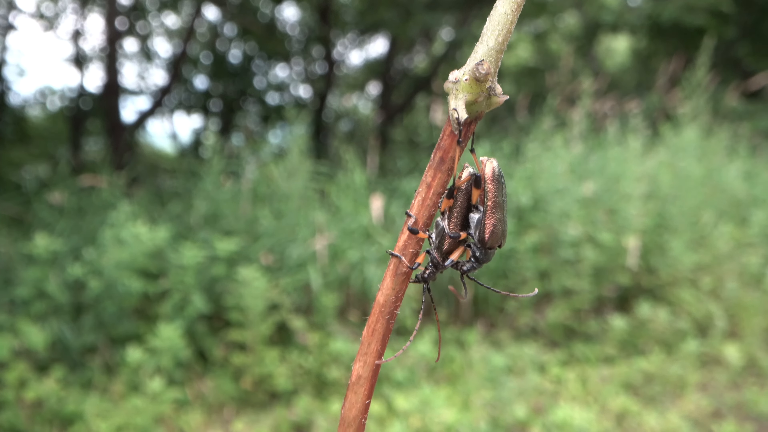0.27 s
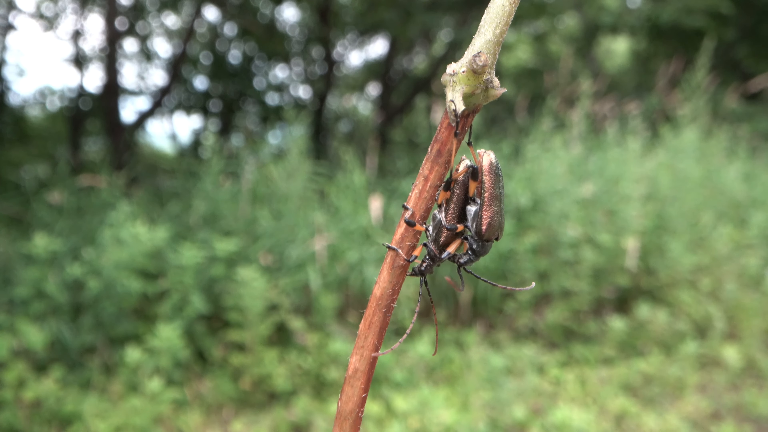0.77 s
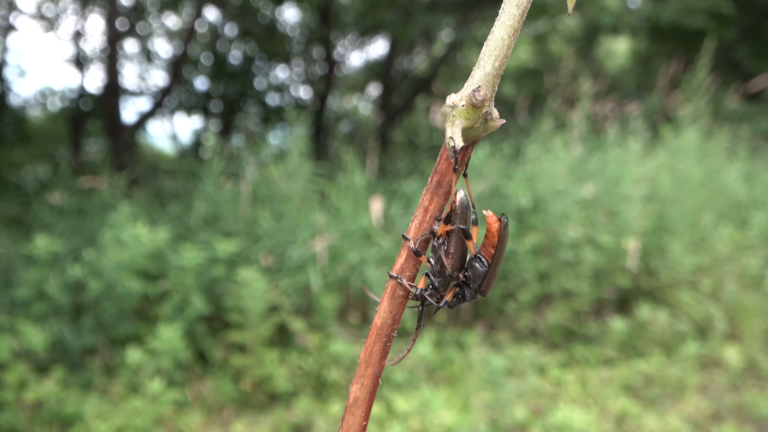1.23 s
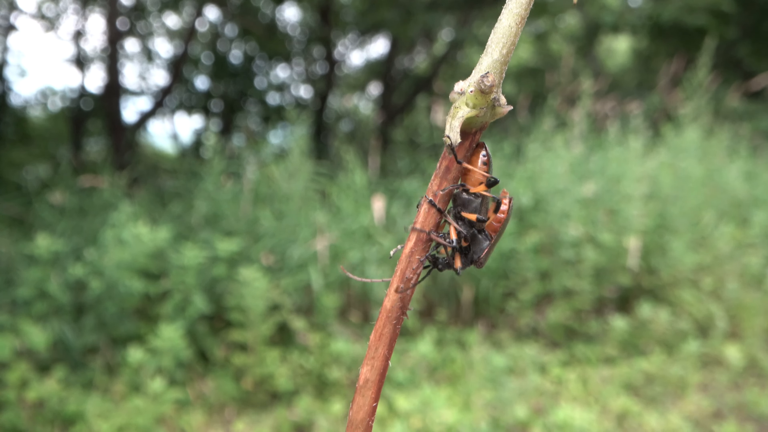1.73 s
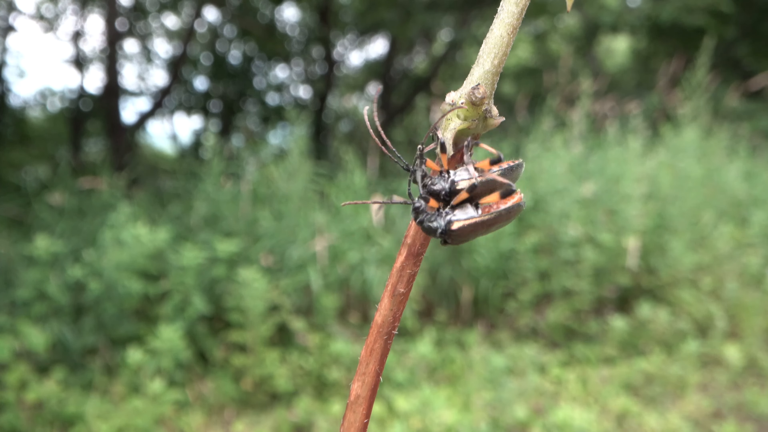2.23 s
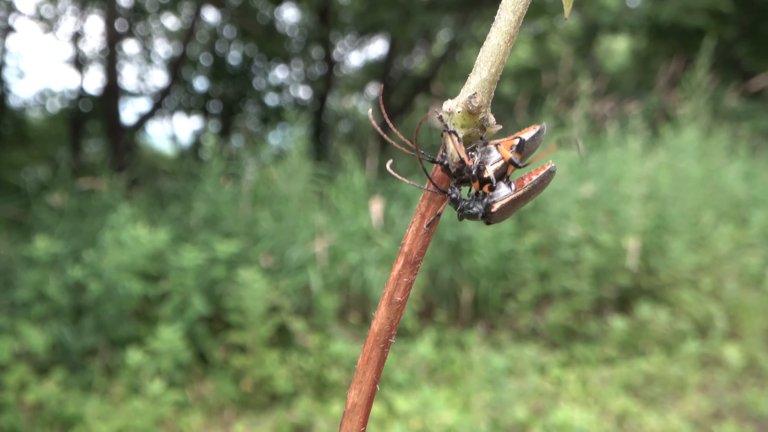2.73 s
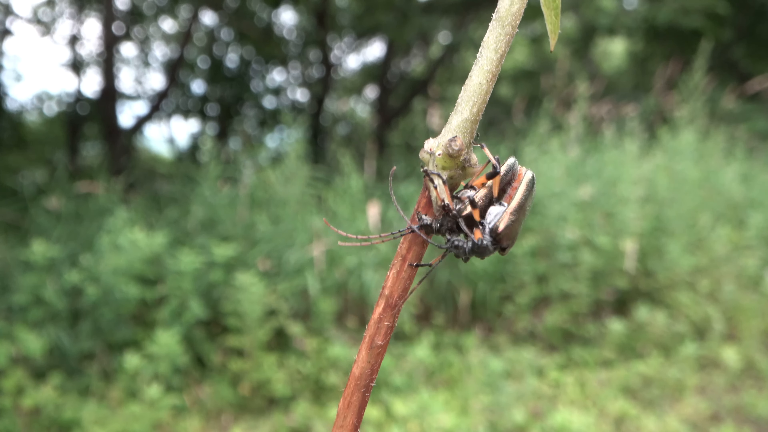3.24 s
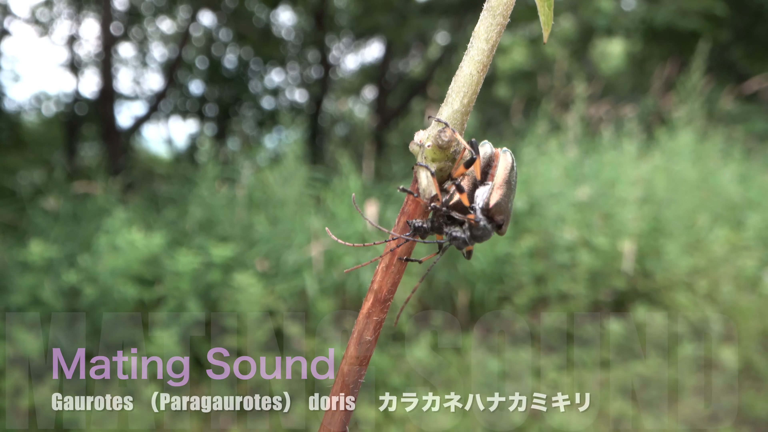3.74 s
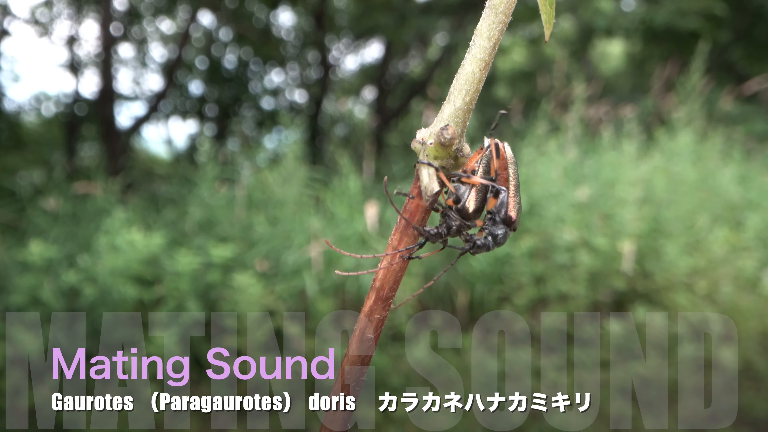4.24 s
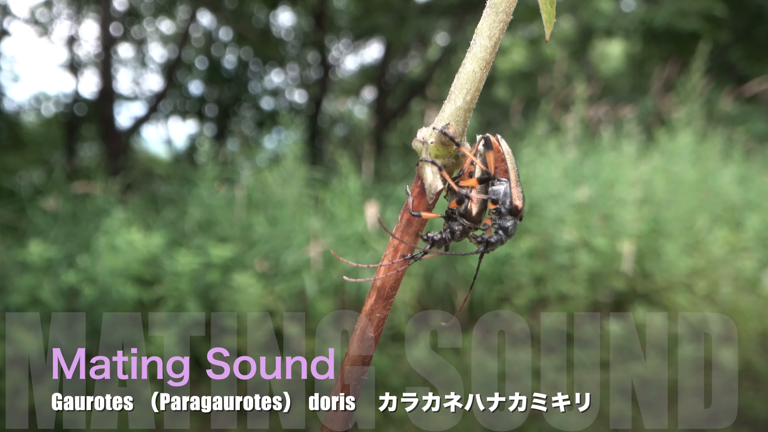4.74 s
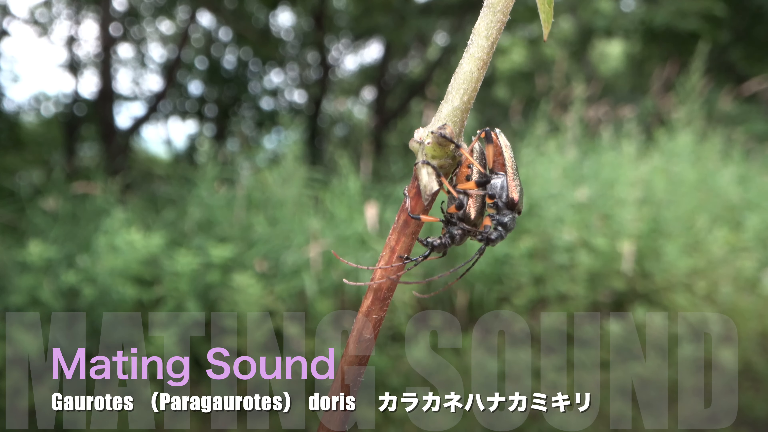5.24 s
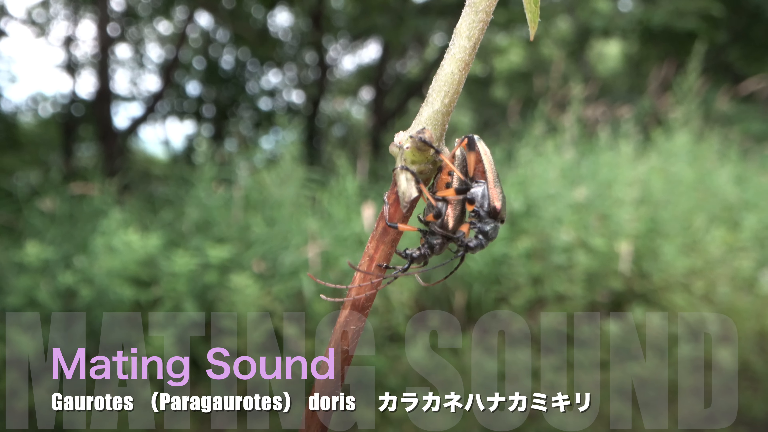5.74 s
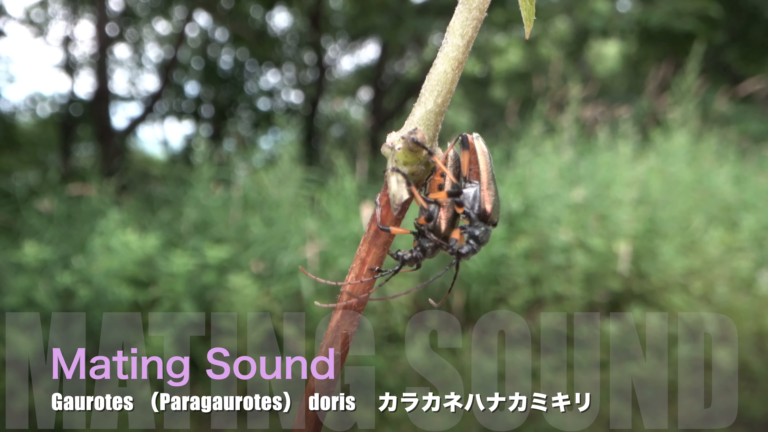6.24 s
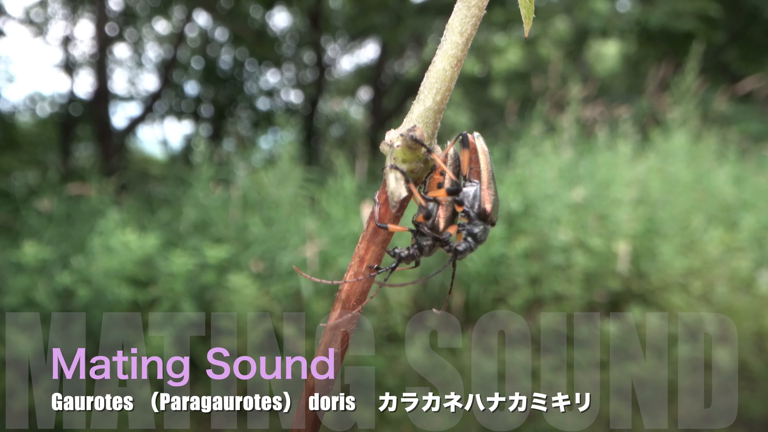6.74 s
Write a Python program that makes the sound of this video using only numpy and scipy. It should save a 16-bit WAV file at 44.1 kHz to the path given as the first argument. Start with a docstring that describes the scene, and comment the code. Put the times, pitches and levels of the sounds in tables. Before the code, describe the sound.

A soft, low, steady rush plays alone for just over a second. Then two beetles scuffle on a thin twig, with dense claw snaps, bark scrapes and small woody thuds, peaking into brief overload near two seconds. The struggle breaks into bursts with two tiny rasping squeaks, then single dry ticks. A contact pickup on the wood makes it huge and intimate, nearly mono, without room echo.

```python
"""Two beetles scramble on a thin twig, heard through a pickup touching the wood, over a soft steady rush of noise.
First the rush is alone; then claws snap and scrape densely, overloading the pickup at the height.
The struggle thins out, with two short squeaks of stick-slip on the bark, and ends in single ticks.
Each contact is a force convolved with the twig's response: a thud, a woody ring and a glassy top."""
import sys
import numpy as np
from scipy import signal
from scipy.fft import rfft, irfft, next_fast_len
from scipy.io import wavfile
from scipy.ndimage import uniform_filter1d

SR = 44100
rng = np.random.default_rng(int(sys.argv[2]) if len(sys.argv) > 2 else 0)


def store_wav(level_fs):
    """Save 16-bit WAV to argv[1]."""
    pcm = np.round(np.clip(np.atleast_2d(level_fs), -1, 1) * 32767)
    wavfile.write(sys.argv[1], SR, pcm.T.astype(np.int16))


N = 308145
TAPS, LEAD = 4096, 400  # twig response length and pre-roll [samples]


def amp(db):
    """Decibels to gain."""
    return 10 ** (np.asarray(db) / 20)


def evened(x):
    """Each row scaled to rms 1."""
    return x / np.sqrt(np.mean(x ** 2, axis=-1, keepdims=True) + 1e-20)


def add(mix, time_s, sound):
    """Adds a sound to the mix in place, cut at the mix's end."""
    part = mix[round(time_s * SR):][:len(sound)]
    part += sound[:len(part)]


# outdoor rush spectrum: (frequency [Hz], relative density [dB per Hz])
RUSH_SPECTRUM = [(25, -20), (55, -9), (150, -3.5), (300, -1), (900, -5.5), (2000, -14), (5000, -23),
                 (15500, -30.5)]


def rush(level_db=-49):
    """Steady noise, strongest in the low middle."""
    hz = np.fft.rfftfreq(N, 1 / SR)
    knot_hz, knot_db = np.transpose(RUSH_SPECTRUM)
    colour = amp(np.interp(np.log(hz + 1), np.log(knot_hz + 1), knot_db))
    return amp(level_db) * evened(irfft(rfft(rng.standard_normal(N)) * colour, N))


# bending modes of twig plus pickup: (frequency [Hz], width [Hz], relative level [dB])
TWIG_MODES = [(49.2, 32, -24), (103, 9.2, -0.5), (274, 100, 3), (342, 132, 2.5), (625, 263, 1.5),
              (1000, 590, -15.5), (1432, 84, -2), (1757, 434, -4.5), (2713, 1160, -3.5), (3192, 226, 7),
              (3427, 336, 4), (3940, 480, -10), (4730, 370, -10.5), (5900, 400, -16.5), (7610, 540, -3.5),
              (8800, 660, -19), (10560, 1900, -23), (13800, 1600, -28.5)]
# thud, ring and top registers: (from [Hz], to [Hz])
REGISTERS_HZ = [(60, 1200), (1200, 5500), (5500, 16000)]


def twig(skirt=1.39, suddenness=0.85, lag_s=0.000655, scatter_db=-15, scatter_t60_s=0.048):
    """Response of the twig's modes to one sharp push at LEAD samples, with bending-wave dispersion."""
    hz = np.fft.rfftfreq(TAPS, 1 / SR) + 1
    power = sum(amp(db) ** 2 / (1 + (2 * (hz - f) / width) ** 2) ** skirt for f, width, db in TWIG_MODES)
    log_gain = .5 * np.log(power + 1e-10)
    # the ring takes a few cycles to build up
    mirrored = np.concatenate([log_gain, log_gain[-2:0:-1]])
    phase = -suddenness * signal.hilbert(mirrored).imag[:len(hz)]
    # bending waves are slower in the bass: the thud trails the tick
    phase -= 4 * np.pi * lag_s * np.sqrt(REGISTERS_HZ[0][1] * hz)
    direct = np.roll(irfft(np.exp(log_gain + 1j * phase)), LEAD)
    # faint returns from joints and far ends of the branch
    returns = rng.standard_normal(TAPS) * amp(-60 * np.arange(TAPS) / SR / scatter_t60_s)
    returns *= amp(scatter_db) / np.linalg.norm(returns)
    return direct + signal.fftconvolve(direct, returns)[:TAPS]


# core of each register: (from [Hz], to [Hz])
CORES_HZ = [(30, 700), (2500, 4000), (7000, 8300)]
# treble from AIR_HZ up takes only this share of the top's extra gain over the ring
AIR_HZ, AIR_SHARE = 9510, .65
# thuds below FIRM_DB lose SWING_SLOPE dB more per dB in the bass below SWING_HZ
SWING_HZ, FIRM_DB, SWING_SLOPE = 174.4, -29.5, 0.31


def excite(wood, force, levels_db, seconds):
    """A force rings the twig; levels_db aims each register's rms over the given time."""
    size = next_fast_len(len(force) + TAPS)
    hz = np.fft.rfftfreq(size, 1 / SR)
    # every spot on the twig favours other modes
    spot_db = np.interp(hz, np.geomspace(200, 16000, 22), 2.5 * rng.standard_normal(22))
    spectrum = rfft(force, size) * rfft(wood, size) * amp(spot_db)
    power = 2 * abs(spectrum) ** 2 / (size * seconds * SR)
    natural_db = [10 * np.log10(power[(hz > lo) & (hz < hi)].sum() + 1e-30) for lo, hi in REGISTERS_HZ]
    gains_db = np.subtract(levels_db, natural_db)
    air_db = gains_db[2] - (1 - AIR_SHARE) * max(gains_db[2] - gains_db[1], 0)
    # flat gain over each core, sloping between cores
    knots_hz = [*np.ravel(CORES_HZ), AIR_HZ]
    knots_db = [*np.repeat(gains_db, 2), air_db]
    tilt_db = np.interp(np.log(hz + 1), np.log(knots_hz), knots_db)
    swing_db = SWING_SLOPE * min(levels_db[0] - FIRM_DB, 0) / (1 + (hz / SWING_HZ) ** 4)
    return irfft(spectrum * amp(tilt_db + swing_db), size)


def registers(strength_db, weight_db, hardness_db):
    """Thud, ring and top levels: strength is the ring, weight thud over ring, hardness top over ring."""
    return np.array([strength_db + weight_db, strength_db, strength_db + hardness_db])


def grit(count, per_s, spread_db):
    """Tiny slips at random moments, most small and a few large."""
    chance, size, sign = rng.random((count, 3)).T
    sizes = amp(spread_db * np.minimum(-np.log(1 - size), 4))
    return (chance < per_s / SR) * sizes * np.sign(sign - .5)


def drag(wood, strokes, per_s, spread_db, fade, clump_db=3.5, contrast_db=4):
    """Strokes over rough bark as dense runs of slips, shared between a soft foot pad and a hard claw."""
    out = np.zeros(N)
    pad_db = [contrast_db, -contrast_db / 2, -contrast_db]
    claw_db = [-contrast_db, contrast_db / 2, contrast_db]
    for part_db in (pad_db, claw_db):
        # the two shares of power add up to 1
        share_db = -10 * np.log10(1 + amp(part_db) ** -2)
        # grip varies over about 10 ms, so slips clump
        grip_db = clump_db * evened(uniform_filter1d(rng.standard_normal(N), size=400))
        bark = grit(N, per_s, spread_db) * amp(grip_db)
        for start_s, end_s, *touch_db in strokes:
            end_s = max(end_s, start_s + .008)
            force = bark[round(start_s * SR):round(end_s * SR)]
            force = force * signal.windows.tukey(len(force), fade)
            sound = excite(wood, force, registers(*touch_db) + share_db, len(force) / SR)
            add(out, start_s - LEAD / SR, sound)
    return out


def release(wood, contacts, settle_s=0.0022, slip_size=0.54, lead_s=.0004, creep_s=0.0026, creep_size=.12):
    """A claw creeps a little, lets go sharply, then slips a few more times as it settles."""
    out = np.zeros(N)
    for time_s, *touch_db in contacts:
        force = np.zeros(2 * LEAD)
        before, after = rng.random((2, 5))
        creeps = LEAD - (before * min(creep_s * SR, LEAD)).astype(int)
        slips = LEAD + (after * min(settle_s * SR, LEAD)).astype(int)
        force[creeps] = creep_size * rng.uniform(-0.72, 1, size=5)
        force[slips] = slip_size * rng.uniform(-0.92, 1, size=5)
        force[LEAD] = 1
        sound = excite(wood, force, registers(*touch_db), seconds=.005)
        add(out, time_s - lead_s - 2 * LEAD / SR, sound)
    return out


# struggle driving the small footwork: (time [s], effort before each layer's trim [dB])
EFFORT = [(1.15, -73), (1.24, -42.5), (1.42, -32), (1.78, -38.5), (1.92, -29), (2.06, -42.5), (2.3, -43.5),
          (2.62, -43), (2.68, -45.5), (2.85, -40), (3.18, -45.5), (3.7, -56), (4.0, -53), (4.28, -49.5),
          (4.61, -44), (4.7, -57.5), (5.05, -54.5), (6.4, -67.5)]


def footwork(time_s, chance, uneven_db, hardness_db, weight_db=4, easy_db=-46, lightening=0.24):
    """Small contacts: feet pad softly at low effort, and the thud's share shrinks as effort grows."""
    effort_db = np.interp(time_s, *np.transpose(EFFORT))
    weights_db = weight_db - lightening * (effort_db - easy_db)
    usual_db = np.column_stack([effort_db, weights_db, np.full(len(time_s), hardness_db)])
    return usual_db + uneven_db * (2 * chance - 1)


def moments(place):
    """One moment in each equal slice of the EFFORT span, so the feet never rest for long."""
    first_s, last_s = EFFORT[0][0], EFFORT[-1][0]
    return first_s + (last_s - first_s) * (np.arange(len(place)) + place) / len(place)


def shuffle(wood, count=80, trim_db=-3, shortest_s=0.042, longest_s=0.087):
    """Short, weak strokes of restless feet; strength follows effort."""
    chance = rng.random((count, 5))
    time_s = moments(chance[:, 0])
    half_s = (shortest_s + (longest_s - shortest_s) * chance[:, 1]) / 2
    touches_db = footwork(time_s, chance[:, 2:], uneven_db=3, hardness_db=-10.5)
    strokes = np.column_stack([time_s - half_s, time_s + half_s, touches_db])
    return amp(trim_db) * drag(wood, strokes, per_s=400, spread_db=3.5, fade=.8)


def patter(wood, count=55, trim_db=4):
    """Small claw ticks at random moments; strength follows effort."""
    chance = rng.random((count, 4))
    time_s = moments(chance[:, 0])
    touches_db = footwork(time_s, chance[:, 1:], uneven_db=3.5, hardness_db=-5)
    return amp(trim_db) * release(wood, np.column_stack([time_s, touches_db]))


# soft foot pads landing: (time [s], level before trims [dB])
BUMPS = [(1.387, -18), (1.4, -15.5), (1.699, -17.5), (2.488, -21.5), (2.772, -25), (2.794, -23),
         (2.871, -19), (2.942, -20), (3.281, -25.5), (4.21, -23.5), (5.045, -32), (5.934, -32.5),
         (6.221, -33.5)]


def bumps(wood, trim_db=-4, ring_db=-24, top_db=-34):
    """Soft pads push the twig: mostly thud, with ring and top far below it."""
    contacts = [(time_s, db + trim_db + ring_db, -ring_db, top_db - ring_db) for time_s, db in BUMPS]
    return release(wood, contacts, settle_s=.005)


# stick-slip squeaks: (strength [dB], weight [dB], hardness [dB], glide of (time [s], slip rate [Hz]))
SQUEAKS = [(-30, -16, -5.5, [(2.813, 1050), (2.828, 977), (2.845, 1024), (2.868, 1170)]),
           (-39.5, -12, -10.5, [(3.306, 1018), (3.324, 1173), (3.340, 1205), (3.355, 1280), (3.367, 1050)])]


def squeaks(wood, jitter=.04, rough=.4, gritty=.6):
    """A claw sticks and slips about 1000 times a second, unevenly and mixed with grit, so it rasps."""
    out = np.zeros(N)
    for *touch_db, glide in SQUEAKS:
        knot_s, knot_hz = np.transpose(glide)
        t = np.arange(knot_s[0], knot_s[-1], 1 / SR)
        slow_noise = uniform_filter1d(rng.standard_normal((2, TAPS * 2)), size=40)
        waver, grip = evened(slow_noise)[:, :len(t)]
        turns = np.cumsum(np.interp(t, knot_s, knot_hz) * (1 + jitter * waver)) / SR
        slips = evened(sum(np.cos(2 * np.pi * k * turns) for k in range(1, 10)))
        slips = slips + gritty * evened(grit(len(t), per_s=4000, spread_db=2))
        force = slips * (1 + rough * grip) * signal.windows.tukey(len(t), .35)
        add(out, knot_s[0] - LEAD / SR, excite(wood, force, registers(*touch_db), len(t) / SR))
    return out


# leg or shell dragging over bark: (start [s], end [s], strength [dB], weight [dB], hardness [dB])
SCRAPES = [(1.279, 1.345, -33, 2.5, -18), (1.341, 1.419, -33.5, 1, -10), (1.438, 1.56, -25, -1.5, -13),
           (1.571, 1.66, -32, -4.5, -7.5), (1.661, 1.703, -27.5, -3, -13.5), (1.825, 1.91, -33, -7, -18),
           (1.843, 1.86, -11.5, -11.5, -12), (1.933, 1.941, -17, -24, -14), (1.945, 1.988, -32.5, 4.5, -13),
           (1.964, 2.033, -25, -10.5, -1), (2.064, 2.118, -42, -18.5, -18), (2.133, 2.177, -39, -5.5, -4),
           (2.182, 2.23, -46, 1, -5), (2.339, 2.389, -37, -7, -19), (2.43, 2.473, -40.5, 4, -20),
           (2.471, 2.525, -51.5, 20.5, -22), (2.505, 2.558, -25.5, -1, -13),
           (2.566, 2.613, -32.5, -8, -14.5), (2.714, 2.826, -49, 12.5, -17),
           (2.849, 2.98, -58.5, 21.5, -20), (3.077, 3.102, -34.5, -1, -23), (3.102, 3.153, -36, 3.5, -14.5),
           (3.235, 3.307, -59.5, 19, -23), (3.37, 3.421, -48.5, 5.5, -12), (4.061, 4.277, -44.5, 6.5, -21),
           (4.308, 4.345, -35, 2, -41), (4.449, 4.546, -37, -8.5, -5.5), (4.553, 4.6, -33.5, -11, -6),
           (4.986, 5.03, -50, 13, -0.5), (5.741, 5.813, -46.5, 5.5, -13), (5.807, 5.855, -43.5, 8, -12)]


def scrapes(wood):
    """Strong strokes of the struggle, as dense slips over bark."""
    return drag(wood, SCRAPES, per_s=1300, spread_db=3.0, fade=0.51)


# claw catching or letting go: (time [s], strength [dB], weight [dB], hardness [dB])
SNAPS = [(1.2776, -21.5, -5.5, -16), (1.2949, -21, -3, -15), (1.301, -24.5, -10, -11),
         (1.3103, -19.5, -2.5, -15), (1.3711, -21.5, -8, -10), (1.444, -23, 0.5, -14),
         (1.4502, -20.5, 3.5, -12), (1.4744, -19, 1, -7), (1.5113, -19.5, -15, -6),
         (1.526, -17.5, -33, -11), (1.5597, -14, -10, -25), (1.5742, -18, -18, -4),
         (1.691, -13.5, -9, -18.5), (1.7227, -26.5, 3, -9), (1.791, -25, -4, -15),
         (1.8143, -18.5, -18, -12.5), (1.8494, -8, -17, -9), (1.8529, -15.5, -15, -19),
         (1.9276, -17, -14, -10), (1.9365, -6, -11.5, -8.5), (1.9565, -14.5, -5, -28),
         (2.2051, -40, 11.5, -17), (2.5018, -25, 7.5, -26), (2.549, -30.5, 9.5, -6),
         (2.7197, -27.5, -3, -23), (2.7544, -27.5, -4, -11), (2.9118, -25.5, -11, -6.5),
         (2.9637, -30, 1, -10), (2.985, -12, -31, -8), (2.9985, -27, 2, 3), (3.0429, -31.5, -24, -9),
         (3.0787, -27.5, 1.5, -13), (3.1139, -24.5, -0.5, -25), (3.239, -37.5, -2, -21),
         (3.372, -24.5, -15, -15.5), (3.5056, -32.5, -4, -20), (3.5697, -42.5, -6, 0.5),
         (3.8057, -38.5, 7.5, -21), (4.2925, -27, -7, -9), (4.4299, -35, -0.5, -2), (4.5599, -23.5, -4, 2),
         (4.5676, -33.5, 0, -7), (4.5796, -32, -22, -3), (4.6314, -30, -4, -7.5), (4.729, -44, -12, -9),
         (4.8243, -41, -1, -13), (4.9229, -38, 3, -2.5), (4.9765, -33, 1.5, -19), (5.12, -41.5, -1.5, -33),
         (5.215, -45, 5, -24), (5.2729, -29, -8, -20), (5.3117, -38, 4, -3.5), (5.4108, -35.5, -4.5, -18),
         (5.422, -32.5, -20, -30), (5.5161, -36.5, 0, -6.5), (5.597, -42, 0.5, -26),
         (5.757, -34.5, -14, -16), (5.8422, -31, -1, -4), (5.8481, -32, -2, -12), (6.014, -45, 4, 3.5),
         (6.2143, -41, 2.5, 3.5), (6.8037, -37, -0.5, -21)]


def snaps(wood, regrip_db=-17, soonest_s=0.0067, latest_s=.035):
    """Clear snaps, then single ticks; after each the claw faintly catches again."""
    regrips = [(time_s + rng.uniform(soonest_s, latest_s), strength_db + regrip_db, *rest)
               for time_s, strength_db, *rest in SNAPS]
    return release(wood, SNAPS) + release(wood, regrips)


# channel balance: (frequency [Hz], left minus right [dB])
LEFT_LEAD = [(800, 1.5), (1400, 0.45), (5000, 0.95)]


def scene():
    """One pickup feeds both channels, the left a little louder, most of all in the bass."""
    wood = twig()
    mono = snaps(wood) + bumps(wood) + scrapes(wood) + squeaks(wood)
    mono = mono + patter(wood) + shuffle(wood) + rush()
    lead_db = np.interp(np.fft.rfftfreq(N, 1 / SR), *np.transpose(LEFT_LEAD))
    return irfft(rfft(mono) * amp([lead_db / 2, -lead_db / 2]), N)


def record(dry, hiss_db=-64, hiss_from_hz=4500, bass_cut_hz=38, ceiling=.93, edge_hz=15900):
    """Adds treble hiss per channel, cuts deep bass, overloads smoothly, then limits the band."""
    hiss_filter = signal.butter(2, hiss_from_hz, "high", fs=SR, output="sos")
    hiss = signal.sosfilt(hiss_filter, rng.standard_normal(dry.shape))
    bass_cut = signal.butter(2, bass_cut_hz, "high", fs=SR, output="sos")
    loud = signal.sosfilt(bass_cut, dry + amp(hiss_db) * hiss)
    clipped = loud / (1 + (loud / ceiling) ** 8) ** (1 / 8)
    band_limit = signal.firwin(401, edge_hz, window=("kaiser", 9), fs=SR)
    return signal.oaconvolve(clipped, band_limit[None], "same")


dry = scene()
out = record(dry)
store_wav(out)
```